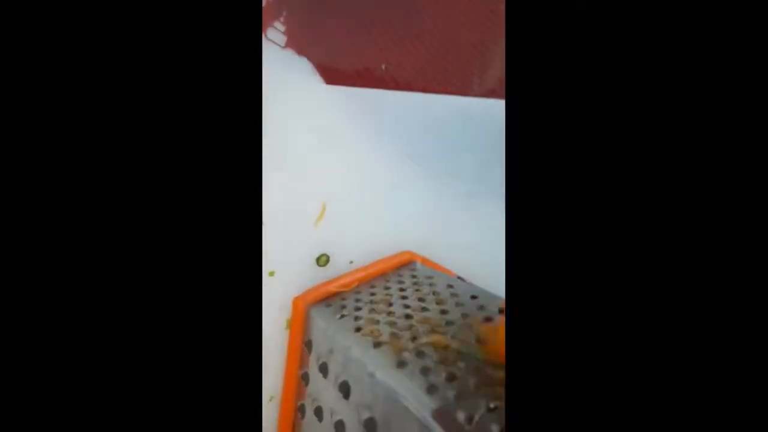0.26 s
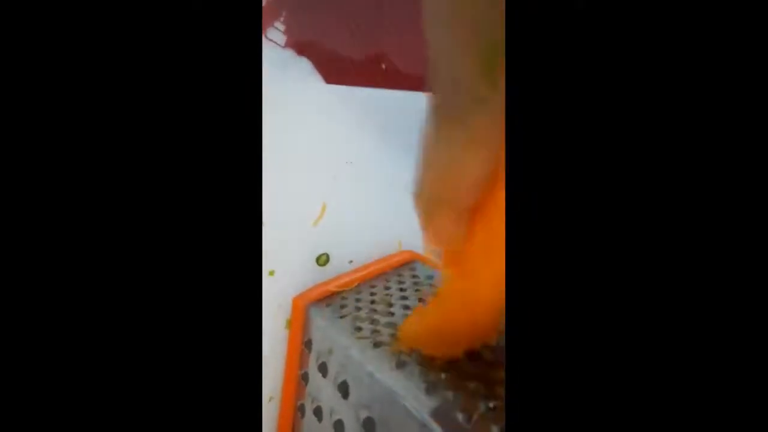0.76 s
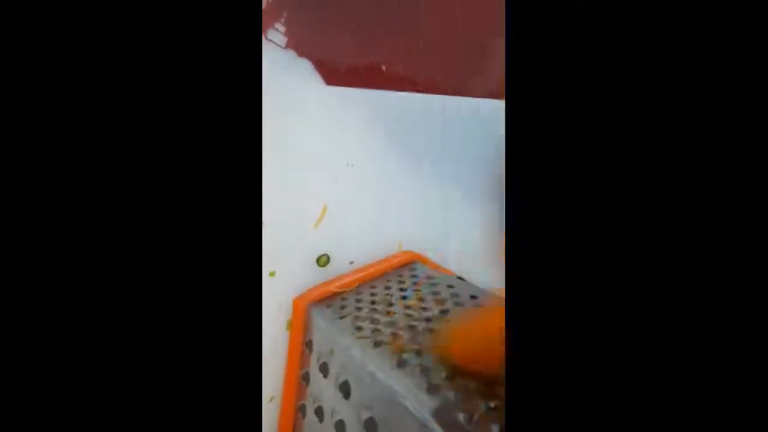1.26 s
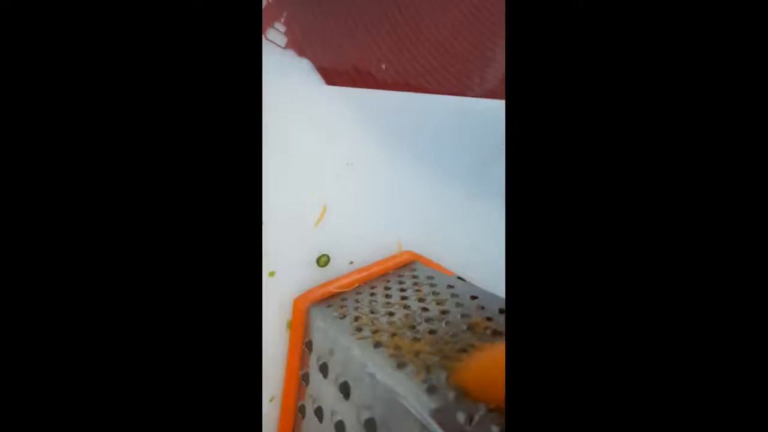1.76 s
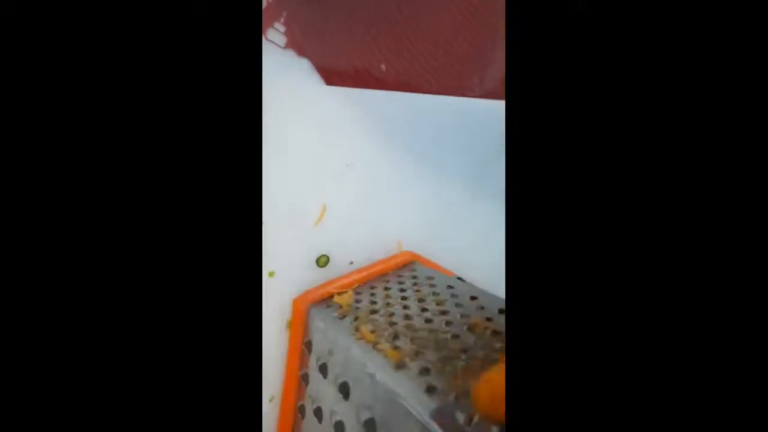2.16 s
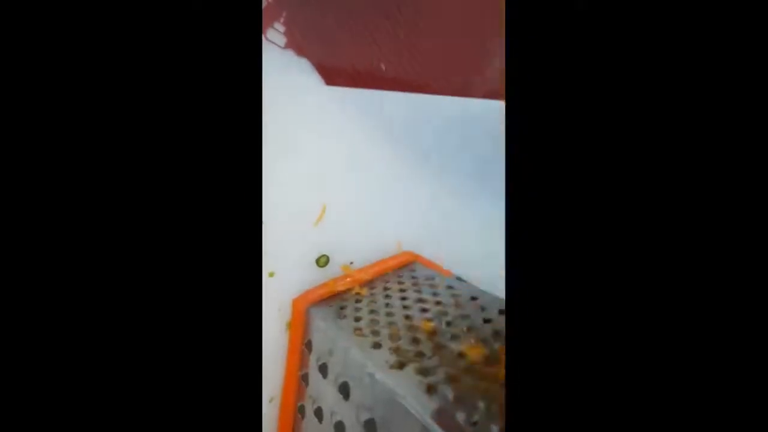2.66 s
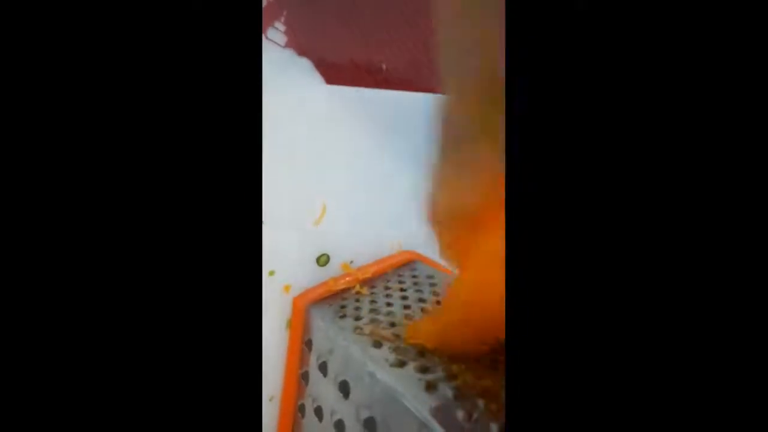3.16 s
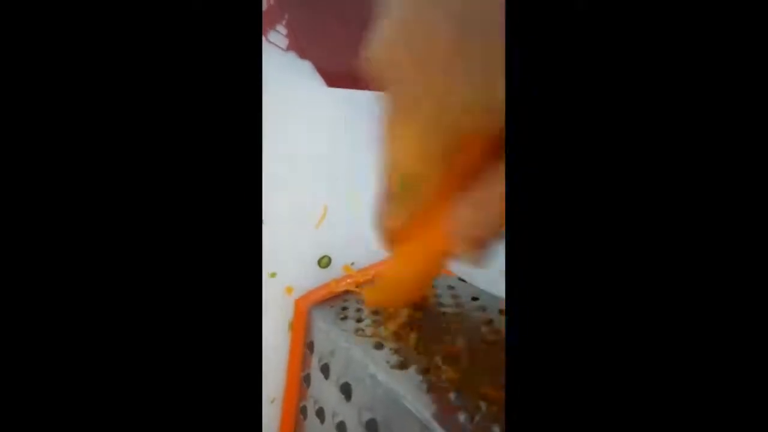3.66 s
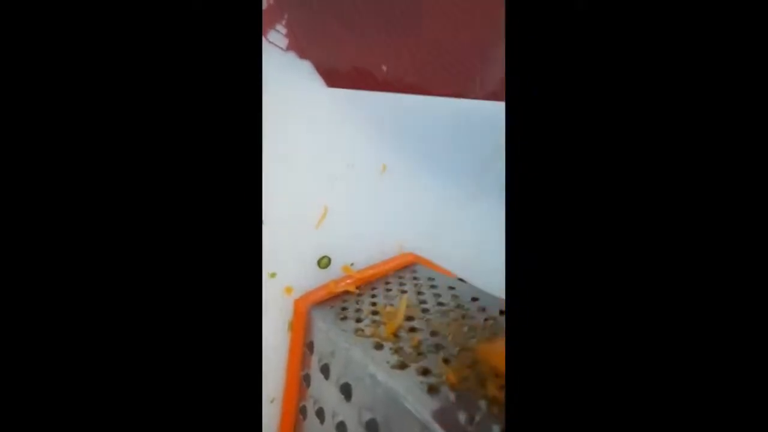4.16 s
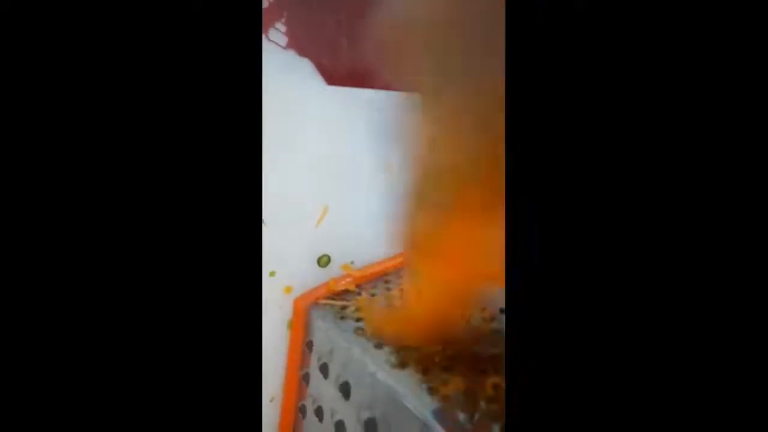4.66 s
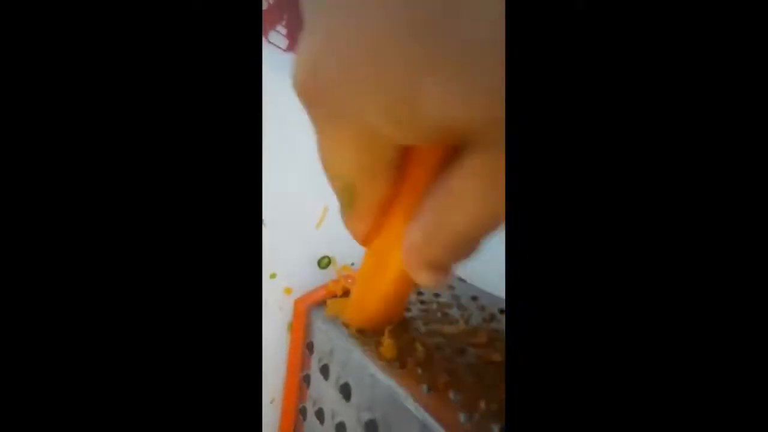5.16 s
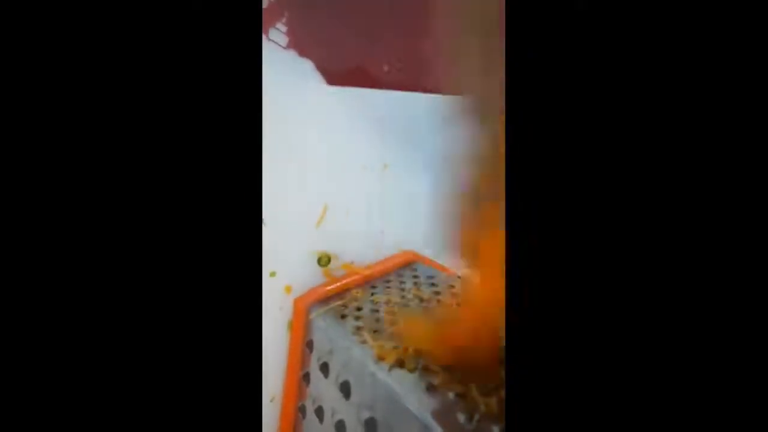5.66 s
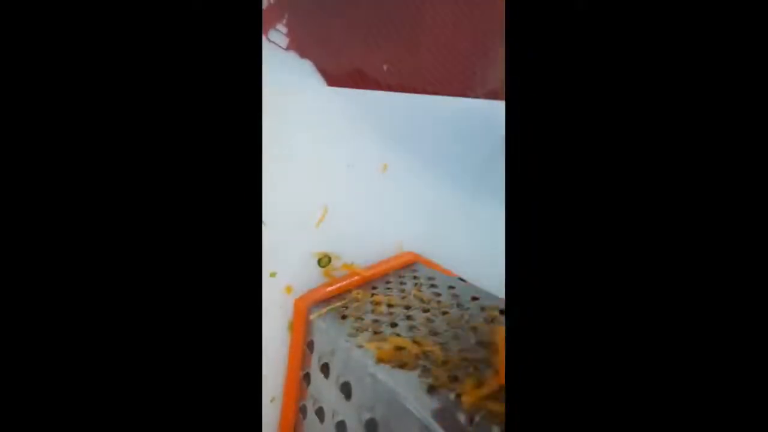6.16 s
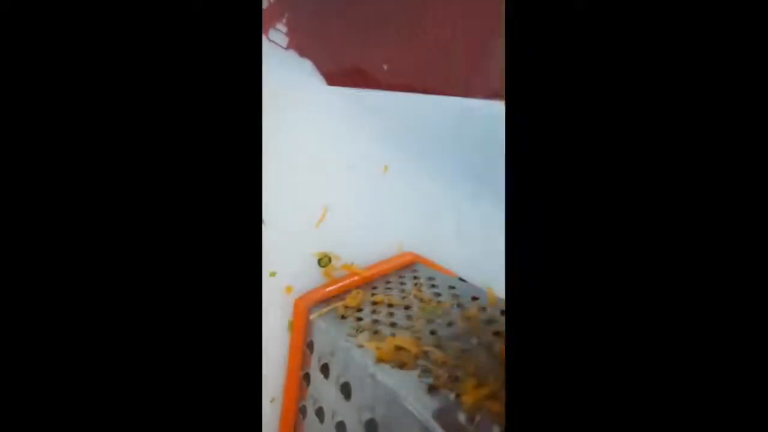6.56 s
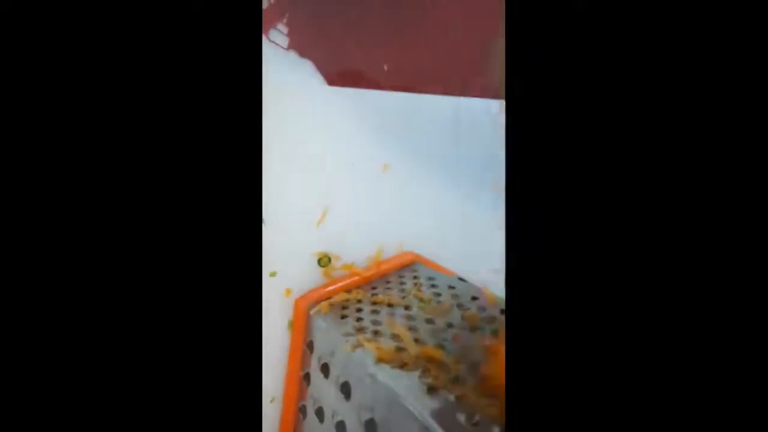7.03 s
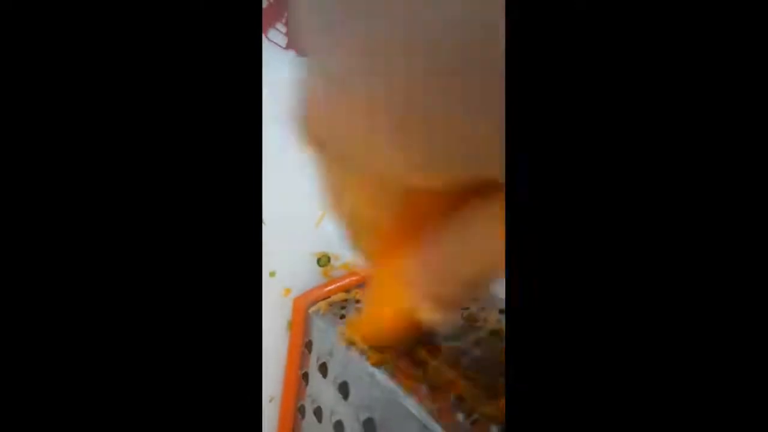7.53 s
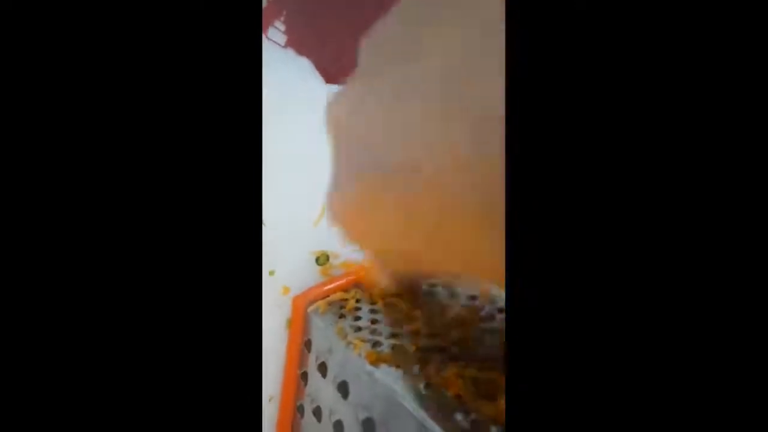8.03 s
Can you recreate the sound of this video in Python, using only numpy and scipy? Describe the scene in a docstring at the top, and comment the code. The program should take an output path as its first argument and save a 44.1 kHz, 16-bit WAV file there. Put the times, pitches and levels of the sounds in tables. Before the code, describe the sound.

In a quiet kitchen, one close microphone hears a carrot worked over a steel box grater for about 8.3 seconds. The first downstroke at 0.15 s is softer; from about 0.5 s firm strokes come every 0.4 s. Each is a gritty rasp of roughly 0.15 s, dense tiny snaps ringing the hollow metal, with moist tearing hiss and a low shudder sinking as pressure eases. Between them come much quieter, lighter return rubs with wet shred ticks. Some strokes snag and double, near 2.2, 3.1, 4.3, 5.8 and 6.6 s. Catches crack irregularly, heaviest near 3.47 and 5.45 s; dull thuds knock the worktop between about 1.0 and 6.6 s. A tiny squeak comes at 6.84 s. From around 5 s, and clearly after 7 s, the cupping hand makes the scraping hollower and less bright. Faint room echo and very low steady background noise remain; rasping continues to the end.

```python
"""A carrot is worked down and up a steel box grater, about two and a half strokes a second, in a quiet kitchen.
Each downstroke drags it over the teeth: random tiny snaps ring the box's resonances, wet flesh tears with
a hiss of denser snaps, and the box shudders in a low wobble. Each return only skims the teeth, with a lighter
rub and flicking shreds. Noise bursts make the catches, short low tones the knocks, wavering tones the squeaks.
Echoes, a cupping hand, a faint room and a steady background noise surround it, as one close microphone hears it."""
import sys
import numpy as np
from scipy import signal
from scipy.fft import rfft, irfft
from scipy.io import wavfile
from scipy.ndimage import uniform_filter1d

SR = 44100
rng = np.random.default_rng(int(sys.argv[2]) if len(sys.argv) > 2 else 0)


def materialize(psi):
    """Save the field psi as 16-bit PCM at rate SR to the path in sys.argv[1].

    A 1-D psi becomes a single channel; in a 2-D psi each row is a channel.
    """
    bounded = np.clip(np.atleast_2d(psi).T, -1, 1)
    quanta = np.round(bounded * 32767).astype(np.int16)
    wavfile.write(sys.argv[1], SR, quanta)


N = 365588
TIME = np.arange(N) / SR
EDGE_HZ = 15900  # upper band limit

# Levels in these tables are starting points: the functions add their own trims.
# downstrokes, two rows when a stroke snags: start t/s, push t/s, hold t/s, rasp level/dB,
# swell during the hold level/dB, tearing against the rasp level/dB, shudder against the rasp level/dB
CUTS = [(0.153, 0.13, 0.066, -50.5, -3.5, -12, -6.5), (0.545, 0.092, 0.013, -47, 7, -12.5, -8.5),
        (0.893, 0.081, 0.015, -42, 3.5, -11, -6), (1.038, 0.028, .006, -60.5, 3, -11, -14),
        (1.251, .076, 0.079, -42.6, 5.5, -10.5, -8), (1.683, 0.11, 0.057, -43, 0.5, -9, -5),
        (2.119, 0.092, .042, -44.5, -6.5, -9.5, -3), (2.242, 0.054, .031, -41.5, -1, -10, -4),
        (2.585, 0.11, 0.065, -46.5, -2.5, -8, -3), (2.977, 0.062, .014, -46.5, -1, -9.5, -6),
        (3.081, 0.037, .031, -44.5, 8, -9, -1.5), (3.353, 0.095, 0.053, -41, 0.5, -8.5, -5.5),
        (3.728, 0.1, 0.051, -43, -0.5, -9.5, -8.5), (4.118, 0.096, 0.021, -42, -1, -10, -11),
        (4.27, .027, 0.022, -47.5, 0, -9.5, -0.5), (4.504, .104, 0.047, -41, -1, -9.5, -5),
        (4.879, 0.114, 0.098, -44.5, -2.5, -9.5, -7), (5.291, 0.12, 0.036, -41, -2.5, -10.5, -7.5),
        (5.685, 0.101, 0.025, -43.5, -1.5, -8, -5.5), (5.836, .009, 0.039, -46, 1, -9.7, -1.5),
        (6.097, 0.0902, 0.085, -44, -4.5, -10, -4), (6.486, 0.099, 0.026, -43, 5, -12, -1),
        (6.611, 0.021, 0.062, -47.5, 1.5, -10.5, -5.5), (6.941, 0.086, 0.058, -42.5, 1.5, -10.5, -5.5),
        (7.338, 0.098, 0.088, -45, -4.5, -10, -5), (7.828, 0.066, 0.045, -42.5, -3.5, -13, -6),
        (8.159, 0.06, 0.061, -47, 3, -13.5, -11)]
# return strokes: start t/s, push t/s, hold t/s, rasp level/dB, swell during the hold level/dB,
# loose shreds against the rasp level/dB
RETURNS = [(-0.024, 0.047, 0.039, -60.5, 1.5, -15), (0.08, 0.024, 0.04, -56, -5, -15.5),
           (0.388, 0.052, 0.085, -55.5, -5.5, -11.5), (0.779, 0.039, 0.053, -63, -2, -11),
           (1.124, 0.042, 0.08, -63, 1.5, -16.6), (1.501, 0.055, .024, -52.3, 1.5, -11.5),
           (1.603, 0.014, 0.031, -63, 7, -11), (1.930, 0.072, 0.07, -56.5, 1, -10.5),
           (2.35, 0.027, 0.14, -55, -2, -12), (2.816, 0.047, 0.081, -62, -1, -13),
           (3.204, 0.059, 0.029, -58, 12, -11), (3.586, 0.064, 0.035, -53.5, -4, -14.5),
           (3.94, .084, 0.066, -58, -13, -7), (4.345, 0.032, 0.078, -56, 6, -11.5),
           (4.722, 0.068, 0.069, -57.5, 0, -12), (5.133, 0.05, 0.055, -52.5, 2.5, -16),
           (5.52, 0.07, 0.057, -54.5, -5, -9), (5.913, 0.046, 0.093, -54, 2.5, -9),
           (6.314, 0.1, 0.023, -54.5, 3.5, -15.5), (6.744, 0.046, 0.081, -55, 5, -16),
           (7.187, 0.035, 0.059, -58, -3, -13), (7.57, 0.054, 0.11, -60.5, -6, -18.5),
           (7.779, .021, 0.007, -60.5, 2, -23), (8.003, 0.067, 0.055, -51, 1.5, -19)]
# the carrot catches on a tooth or lands on the steel: t/s, peak level/dB, treble against the body level/dB
CATCHES = [(0.103, -43, -26), (0.494, -37.5, -9), (0.516, -44, -15), (0.862, -46, -23), (0.909, -50, -24),
           (1.061, -43, -7), (1.286, -38, -19), (1.534, -54, -30), (2.17, -41, -22), (2.305, -34, -12),
           (2.375, -37, -13), (2.603, -52, -26), (3.003, -37, -17), (3.104, -35, -12), (3.234, -47, -4),
           (3.263, -40, -20), (3.472, -26, -23), (4.392, -36.5, -28), (4.521, -49, -22), (4.838, -60, -25),
           (5.213, -44, -3), (5.334, -35.5, -26), (5.449, -30.5, -23), (5.611, -37, -16), (5.955, -38, -22),
           (6.056, -50, -25), (6.345, -52, -1), (6.437, -39.5, -23), (6.548, -46.5, -15), (6.845, -40, -34),
           (6.97, -48, -24), (7.351, -55, -20), (7.797, -43, -24), (7.843, -43, -19), (8.188, -44, -25)]
# brief stick-slip squeaks on wet steel: start t/s, length t/s, middle pitch f/Hz, level/dB
SQUEAKS = [(0.102, 0.031, 3360, -64), (2.368, 0.2, 3980, -67.5), (6.843, 0.013, 3350, -45)]
# the rim of the box knocks on the worktop: t/s, peak level/dB
KNOCKS = [(0.976, -56), (1.403, -37), (1.828, -41), (2.318, -35.5), (2.768, -45), (3.149, -45),
          (3.427, -51), (3.519, -38), (4.306, -51), (4.654, -52), (5.448, -36.5), (5.885, -40),
          (6.197, -39), (6.603, -50)]
# how far the hand covers the grater as the carrot gets shorter: t/s, cover/0-1
COVER = [(0, 0), (2, 0.1), (4, 0), (5.3, 0.27), (6.3, 0.37), (7.3, 0.69), (8.29, 0.7)]
# resonances of the steel box: f/Hz, width f/Hz, height level/dB
BOX = [(256, 49, 7), (341.2, 19, 7), (409.5, 19, 7), (549, 120, 5), (758, 200, 4), (993, 105, 8.5),
       (1185, 12.4, 6), (1297, 73, 8.5), (1396, 94, 7.5), (1540, 210, 4), (1987, 340, 8.5), (2146, 75, 1.5),
       (3106, 110, 6), (3264, 174, 7), (3519, 108, 11.5), (3800, 43, 2), (4140, 95, 8), (5530, 180, 2)]
# high resonances of the thin perforated face: f/Hz, width f/Hz, height level/dB
FACE = [(4470, 170, 4), (5460, 240, 5.5), (6820, 1500, 5.5), (8700, 210, 1.5), (9750, 300, -0.5),
        (10900, 250, 1.5), (15130, 300, 3)]
# broad colour of the rasp beneath the resonances: f/Hz, level/dB
RASP = [(30, -12), (190, -11), (460, -10.5), (650, -6.5), (880, -6), (1100, -13.5), (1500, -8.5),
        (2150, -10.5), (2500, -16), (3600, -12), (4500, -34), (7400, -55), (10500, -25), (16000, -58)]
# change of the rasp's colour on the return: f/Hz, level/dB
SKIM = [(60, -1.5), (200, -1), (600, -1), (1000, -1.5), (2000, -2), (3400, 1.5), (5000, -2.5),
        (16000, -1.5)]
# colour of tearing flesh: f/Hz, level/dB
TEAR = [(100, -20), (1000, -1), (2600, 9), (4200, 5), (5600, 1), (7400, -5.5), (8500, 1.5), (11000, 3.5),
        (11900, -4), (13500, -2), (16000, -2)]
# colour of loose shreds sliding on the steel: f/Hz, level/dB
SHREDS = [(100, -31), (2600, 12), (4200, 9), (5600, 3.5), (7400, -6.5), (8600, 6), (11200, 2.5),
          (11900, -7), (16000, -4.5)]
# colour of the teeth's snaps as the stroke starts: f/Hz, level/dB
FIRST_BITE = [(100, -10.5), (700, 4), (2000, -5), (3400, 2), (5000, -4), (16000, 1.5)]
# colour of the teeth's snaps as the stroke ends: f/Hz, level/dB
LAST_BITE = [(100, -2.5), (350, 5), (800, -2.5), (2000, -1), (3400, -0.5), (5000, 5.5), (16000, 0)]
# colour of jolts passed on by the worktop: f/Hz, level/dB
WORKTOP = [(20, -35.0), (45, 0.5), (70, 3.0), (100, -2.0), (130, 1.5), (150, -4), (170, -3.5), (195, -14),
           (600, -40.5)]
# colour under the cupped hand, counted from a cover of one third: f/Hz, change for full cover level/dB
CUPPED = [(100, 2), (165, 5), (210, 4.5), (330, 2.5), (500, 0), (1100, 1), (1900, 0.5), (2300, 10),
          (2800, -1.5), (3500, -1), (5500, 2), (7500, 2.5), (10500, 0), (12500, -5), (16000, -5)]
# how long the kitchen's echo takes to fall by 60 dB: f/Hz, decay t/s
KITCHEN = [(100, 0.55), (600, 0.73), (3000, 0.31), (8000, 0.33), (16000, 0.17)]
# colour of the background noise: f/Hz, level/dB
BACKGROUND = [(20, -24), (50, -0.5), (150, -19), (600, -13), (2000, -51), (6000, -23.5), (16000, -26.5)]
# How each sound answers the pressure of the hand. All six laws have the same columns:
# power of the rise, multiple of the swell, lag behind the let-go t/s, release t/s
# rasp of the downstroke
RASP_LAW = (1.61, 1.24, 0.0011, 0.015)
# tearing flesh
TEAR_LAW = (3.07, 1.5, 0.0017, 0.013)
# rub of the return stroke
SKIM_LAW = (1, 1.0, 0.0009, 0.023)
# loose shreds
SHREDS_LAW = (1.84, 0.62, .001, 0.021)
# rocking of the box
ROCK_LAW = (3.8, .6, 0.038, 0.013)
# jolts from single teeth
JUDDER_LAW = (1.95, 1.1, 0.0067, 0.016)


def from_db(db):
    """Turns decibels into a gain."""
    return 10 ** (np.asarray(db) / 20)


def unit(x):
    """Scales a sound to an average (rms) strength of 1."""
    return x / np.sqrt(np.mean(x ** 2) + 1e-20)


def read(points, hz):
    """Reads a table at the given frequencies, with straight lines on a log-frequency axis."""
    f, value = np.transpose(points)
    return np.interp(np.log(hz + 1), np.log(f), value)


def wander(hz):
    """Smooth random drift of rms 1, mostly slower than hz."""
    f = np.fft.rfftfreq(N, 1 / SR)
    spectrum = rfft(rng.standard_normal(N))
    return unit(irfft(spectrum * np.exp(-(f / hz) ** 2), N))


def response(*colours, modes=(), size=8192):
    """How a body rings after one tap: a decay of energy 1 with the given colours and resonances."""
    hz = np.fft.rfftfreq(size, 1 / SR)
    db = sum(read(colour, hz) for colour in colours)
    db = db + sum(height / (1 + (2 * (hz - f) / width) ** 2) for f, width, height in modes)
    # minimum phase: the ring starts at the tap, never before it
    log_gain = np.log(from_db(np.r_[db, db[-2:0:-1]]))
    spectrum = np.exp(np.conj(signal.hilbert(log_gain)))
    ring = np.fft.ifft(spectrum).real[:size // 2]
    return ring / np.linalg.norm(ring)


def through(x, ring):
    """Lets every sample of x set off the ring."""
    return signal.oaconvolve(x, ring)[:len(x)]


def add(mix, s, sound):
    """Lays a sound into the mix at time s."""
    part = mix[int(s * SR):][:len(sound)]
    part += sound[:len(part)]


def snaps(per_s, spread_db, grip):
    """Tiny fractures of uneven size, clumped by the grip of the teeth; the hand keeps their mean force steady."""
    size = from_db(spread_db * np.minimum(rng.exponential(1, N), 4))
    happens = rng.random(N) < per_s / SR
    clicks = happens * rng.choice([-1, 1], N) * size * grip
    mean_power = abs(uniform_filter1d(clicks ** 2, size=900))  # over 20 ms
    return clicks / np.sqrt(mean_power + 1e-6)


def played(strokes, law, axis=None, late_s=0):
    """Gain over time: the hand pushes in, holds with a swell or sag, and lets go.

    axis picks a column with a level relative to the rasp; late_s slows the rise."""
    steepness, share, lag_s, release_s = law
    power = np.zeros(N)
    for row in strokes:
        start, push, hold, db, swell_db = row[:5]
        span = (TIME > start) & (TIME < start + .5)
        t = TIME[span] - start
        rise = np.minimum(t / (push + late_s), 1) ** steepness
        swell = share * swell_db * (np.clip((t - push) / hold, 0, 1) - .5)
        release = np.exp(-np.maximum(t - push - hold - lag_s, 0) / release_s)
        relative_db = row[axis] if axis else 0
        power[span] += (rise * release * from_db(db + swell + relative_db)) ** 2
    return np.sqrt(power)


def since_let_go():
    """Seconds since the hand eased off in the latest downstroke; negative while it presses, 0 before the first."""
    since = np.zeros(N)
    for start, push, hold, *_ in CUTS:
        span = TIME >= start
        since[span] = TIME[span] - (start + push + hold)
    return since


def pulp(fill_s=0.046):
    """How full the teeth are, 0-1: empty at each bite, full shortly after the hand eases off."""
    filled = np.zeros(N)
    for start, push, hold, *_ in CUTS:
        span = TIME >= start
        filled[span] = np.minimum((TIME[span] - start) / (push + hold + fill_s), 1)
    return filled


def kitchen_background():
    """Steady random noise, coloured like the quiet kitchen."""
    return through(rng.standard_normal(N), response(BACKGROUND))


def kitchen_echo(x, delay_s=0.0027):
    """Dense reflections from hard walls: the middle pitches last longest and the top treble dies first."""
    taps = rng.standard_normal(SR // 2) * (np.arange(SR // 2) > delay_s * SR)
    hz, t, z = signal.stft(taps, SR, nperseg=256)
    z = z * 1e-3 ** (t / read(KITCHEN, hz)[:, None])
    tail = signal.istft(z, SR)[1]
    return through(x, tail / np.linalg.norm(tail))


def under_hand(x):
    """The hand closes in over the teeth, shading the top treble and adding a hollow ring."""
    hz, t, z = signal.stft(x, SR, nperseg=512, noverlap=384)
    cover = np.interp(t, *np.transpose(COVER)) - 1 / 3
    z = z * from_db(read(CUPPED, hz)[:, None] * cover)
    return signal.istft(z, SR, nperseg=512, noverlap=384)[1][:N]


def inside_box(x, echo_db=-11, decay_s=0.002):
    """The treble bounces for a few milliseconds between the steel walls."""
    t = np.arange(SR // 20) / SR
    echoes = rng.standard_normal(len(t)) * np.exp(-t / decay_s) * (t > .0005)
    echoes = unit(echoes) / np.sqrt(len(t))
    treble = signal.sosfilt(signal.butter(2, 3000, "highpass", fs=SR, output="sos"), x)
    return x + from_db(echo_db) * through(treble, echoes)


def box_ring(x, *colours, count=6, mode_db=2.6, detune=.006, travel_hz=9):
    """Each patch of teeth drives the box's modes in its own proportions; the carrot slides from patch to patch."""
    place, out = wander(hz=travel_hz), np.zeros(N)
    # patches come in opposite pairs, so their differences balance out
    chance = rng.standard_normal((count // 2, len(BOX), 3))
    for k, draw in enumerate(np.concatenate([chance, -chance])):
        modes = np.array(BOX) * (1 + draw * [detune, 0, 0]) + draw * [0, 0, mode_db]
        distance = abs((2 * place - k) % count - count / 2)
        share = np.clip(1 - distance, 0, 1)
        out += through(x * share, response(*colours, modes=modes))
    return out


def knocks(ring_hz=64, decay_s=0.0067, knock_db=-1):
    """A hard bite tips the box against the worktop: a dull, quickly damped thud."""
    t, out = np.arange(SR // 8) / SR, np.zeros(N)
    thud = np.sin(2 * np.pi * ring_hz * t) * np.sqrt(t) * np.exp(-t / decay_s)
    for s, db in KNOCKS:
        add(out, s, from_db(db + knock_db) * thud / abs(thud).max())
    return out


def squeaks(waver=0.053):
    """The carrot sticks and slips for a moment, at an unsteady pitch."""
    drift, out = 1 + waver * wander(hz=337), np.zeros(N)
    for s, length, hz, db in SQUEAKS:
        swell = np.sin(np.pi * np.clip((TIME - s) / length, 0, 1))
        tone = np.sin(2 * np.pi * np.cumsum(hz * drift) / SR)
        out += np.sqrt(2) * from_db(db) * swell * tone
    return out


def flicks(per_s=45, spread_db=5.5, flick_db=14, smear_s=.0022):
    """On the way back, single wet shreds flick off the teeth with tiny ticks, louder where more of them slide."""
    size = from_db(spread_db * np.minimum(rng.exponential(1, N), 3))
    ticks = (rng.random(N) < per_s / SR) * size * played(RETURNS, SHREDS_LAW, axis=5)
    t = np.arange(SR // 50) / SR
    smack = rng.standard_normal(len(t)) * np.exp(-t / smear_s)
    smacks = through(ticks, smack / np.linalg.norm(smack))
    return from_db(flick_db) * through(smacks, response(SHREDS, modes=FACE))


def returns(grip_db=1.55, rasp_db=0.24, shreds_db=1.5, patchy_db=5.0, uneven_db=1.2):
    """The carrot skims the blunt side of the teeth: a finer, lighter rub with a few wet shreds."""
    grip = from_db(grip_db * wander(hz=178))
    drag = from_db(uneven_db * wander(hz=45))
    rub = snaps(per_s=7600, spread_db=1.5, grip=grip)
    wet = snaps(per_s=6400, spread_db=-1.5, grip=grip ** .5)
    rasp = box_ring(rub * drag * played(RETURNS, SKIM_LAW), RASP, SKIM)
    sliding = wet * drag * played(RETURNS, SHREDS_LAW, axis=5)
    shreds = through(sliding, response(SHREDS, modes=FACE))
    # thick (lower) and fine (higher) shreds take turns under the carrot
    thick = signal.sosfiltfilt(signal.butter(3, 7200, fs=SR, output="sos"), shreds)
    turn = from_db(patchy_db / 2 * wander(hz=30))
    shreds = thick * turn + (shreds - thick) / turn
    return from_db(rasp_db) * rasp + from_db(shreds_db) * shreds


def catches(crumble_s=0.0069, crack_s=0.0018, body_db=-5.5, crack_db=4):
    """The carrot catches or lands: a sharp wet crack together with a brief crumbling that rings the box."""
    body, crack = response(RASP, SKIM, modes=BOX), response(SHREDS, modes=FACE)
    t, out = np.arange(len(body)) / SR, np.zeros(N)
    for s, db, treble_db in CATCHES:
        burst = rng.standard_normal(len(t))
        hit = from_db(body_db) * through(burst * np.exp(-t / crumble_s), body)
        hit += from_db(crack_db + treble_db) * through(burst * np.exp(-t / crack_s), crack)
        add(out, s, from_db(db) * hit / abs(hit).max())
    return out


def shudder(pressed_hz=74, free_hz=48, release_s=0.046, ease_s=0.00827, build_s=0.01276,
            rock_db=-4.0, judder_db=-3):
    """The box rocks on its rim, fast while pressed down and slower as the hand lets up."""
    pressed = np.clip(1 - (since_let_go() + ease_s) / release_s, 0, 1)
    hz = (free_hz + (pressed_hz - free_hz) * pressed) * np.exp(0.18 * wander(hz=41.0))
    wobble = np.sin(2 * np.pi * np.cumsum(hz) / SR)
    rock = unit(wobble * from_db(3.3 * wander(hz=41)))
    # single teeth jolt the worktop through the rim; the weight of the hand evens out the jolts
    judder = through(snaps(per_s=900, spread_db=3.0, grip=1), response(WORKTOP))
    judder = judder / np.sqrt(abs(uniform_filter1d(judder ** 2, size=2200)) + 1e-6)
    rocking = rock * played(CUTS, ROCK_LAW, axis=6, late_s=build_s)
    juddering = judder * played(CUTS, JUDDER_LAW, axis=6)
    return from_db(rock_db) * rocking + from_db(judder_db) * juddering


def downstrokes(grip_db=0.5, rasp_db=0.62, tear_db=3.0, tear_grip=.5, uneven_db=1.27):
    """Teeth bite and let go: their snaps ring the box while the flesh between them tears."""
    grip = from_db(grip_db * wander(hz=271))
    teeth = snaps(per_s=4200, spread_db=1.5, grip=grip)
    # the colour of the bite shifts as the teeth fill with pulp
    filled = pulp()
    empty_teeth = through(teeth, response(FIRST_BITE))
    full_teeth = through(teeth, response(LAST_BITE))
    teeth = (1 - filled) * empty_teeth + filled * full_teeth
    cells = snaps(per_s=14000, spread_db=2.0, grip=grip ** tear_grip)
    juice = from_db(0.75 * wander(hz=70))  # firm and wet spots alternate
    drag = from_db(uneven_db * wander(hz=45))  # the carrot drags unevenly from one row of teeth to the next
    rasp = box_ring(teeth * drag * played(CUTS, RASP_LAW), RASP)
    tearing = cells * juice * drag * played(CUTS, TEAR_LAW, axis=5)
    tear = through(tearing, response(TEAR, modes=FACE))
    return from_db(rasp_db) * rasp + from_db(tear_db) * tear


def scene(catch_db=-4, room_db=-17, background_db=-82):
    """The grater close by, a little of the kitchen behind it; both channels alike."""
    background = kitchen_background()
    strokes = downstrokes() + returns()
    scraping = inside_box(strokes + flicks() + squeaks() + from_db(catch_db) * catches())
    grater = under_hand(scraping + shudder() + knocks())
    # a small box sends little bass into the room
    radiated = signal.sosfilt(signal.butter(2, 150, "highpass", fs=SR, output="sos"), grater)
    mono = grater + from_db(room_db) * kitchen_echo(radiated) + from_db(background_db) * background
    return np.array([mono, mono])


def record(dry):
    """The microphone sheds the deepest bass; then a steep filter removes the treble above the band limit."""
    thinned = signal.sosfiltfilt(signal.butter(2, 29, "highpass", fs=SR, output="sos"), dry)
    edge = signal.firwin(801, EDGE_HZ, window=("kaiser", 8), fs=SR)
    return signal.oaconvolve(thinned, edge[None], "same")


dry = scene()
out = record(dry)
materialize(out)
```